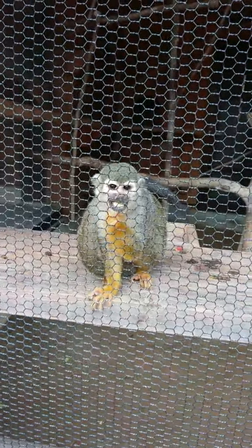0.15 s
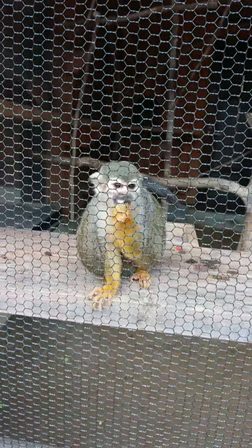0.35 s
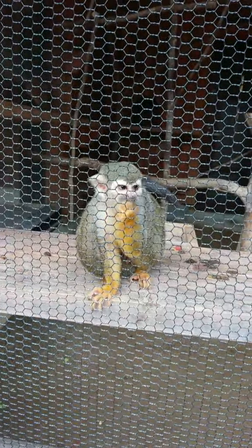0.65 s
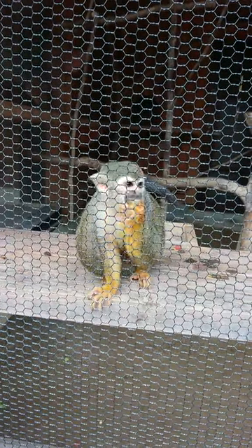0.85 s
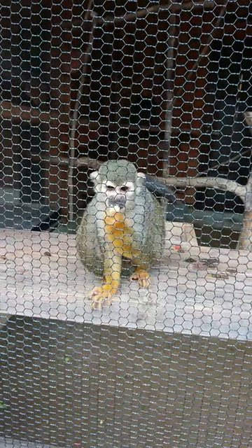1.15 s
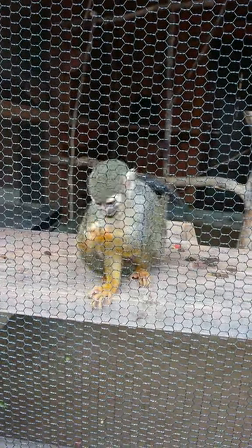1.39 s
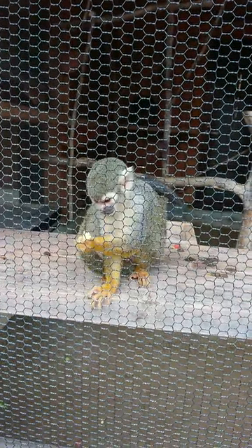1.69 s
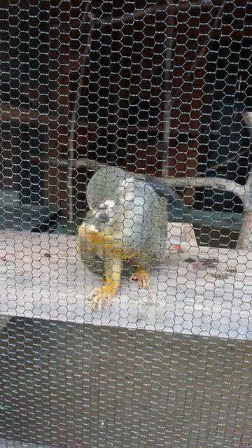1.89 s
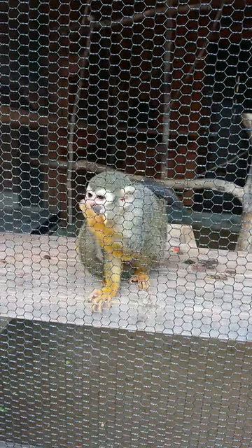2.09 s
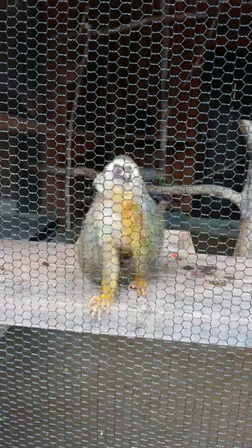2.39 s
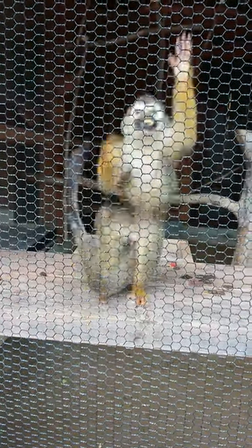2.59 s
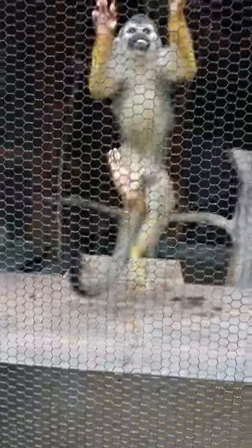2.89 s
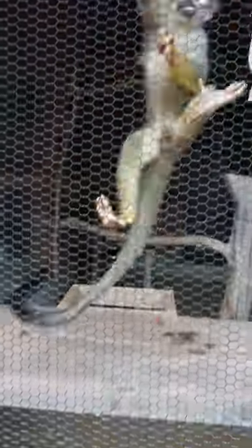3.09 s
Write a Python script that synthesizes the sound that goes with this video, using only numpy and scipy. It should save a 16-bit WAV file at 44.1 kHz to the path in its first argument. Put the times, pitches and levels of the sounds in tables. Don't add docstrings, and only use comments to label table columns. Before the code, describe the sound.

Small monkey peeps: a whistled call breaks upward at 0.2-0.4 s, then a faint chirp at 1.4 and a loud falling one at 1.5. Faint hoarse distant calls fall around 1.9-2.4. Very high chirps cluster at 2.6-2.8, and another breaking call comes at 2.9. Brief wall reverberation and faint insect hiss on the left; gusty rumble, scattered soft knocks and a grip rustle at 1.7-1.8 on the right.

```python
import sys
import numpy as np
from scipy import signal
from scipy.fft import rfft, irfft
from scipy.io import wavfile
from scipy.ndimage import uniform_filter1d

SR = 44100
rng = np.random.default_rng(int(sys.argv[2]) if len(sys.argv) > 2 else 0)


def wav_out(sig):
    wavfile.write(sys.argv[1], SR, np.round(np.clip(np.atleast_2d(sig).T, -1, 1) * 32767).astype(np.int16))


def amplitude_ratio(level_db):
    exponent = np.asarray(level_db, float) / 20
    return 10 ** exponent


N = 143325

# pitch_hz, density_db (per Hz)
OPEN_AIR = [(40, -78), (130, -79), (430, -89.5), (1700, -93), (3500, -100), (8600, -105), (9700, -122),
            (12500, -135)]
COVERED_AIR = [(200, -86.5), (430, -83.5), (860, -98), (1700, -107), (3500, -115), (4700, -120),
               (5400, -132), (9000, -140)]
# pitch_hz, density_db (per Hz)
HISS = [(4000, -137), (7000, -133), (10000, -123), (12600, -122), (13300, -136), (14300, -142),
        (15300, -132), (15800, -131)]
# pitch_hz, density_db (per Hz)
WIND = [(22, -85), (32, -87), (45, -59), (80, -56.5), (130, -71.5), (220, -81.5), (400, -116), (1500, -170)]
# start_s, level_db
GUSTS = [(0.0, -58), (0.04, -66.5), (0.27, -56.5), (0.4, -63), (0.46, -40.5), (0.5, -60), (0.97, -61.5),
         (0.99, -50.5), (1.25, -63), (1.31, -50), (1.37, -63), (1.67, -56), (1.72, -39), (1.88, -56),
         (2.94, -58.5), (3.09, -44), (3.13, -61), (3.25, -58.5)]
# pitch_hz, width_hz, level_db
INSECTS = [
    (5300, 1200, -65.5),
    (7680, 300, -77),
    (1605, 200, -75.5),
    (859, 170, -66.5),
]
# start_s, pitch_hz, level_db
BROKEN_CALLS = [
    [(.205, 6000, -49), (.209, 5530, -33.5), (.213, 5110, -29.5), (.222, 4992, -29.5), (.233, 4990, -36),
     (.236, 5200, -41)],
    [(.235, 5660, -44), (.245, 6060, -36), (.27, 6220, -33.5), (.285, 6280, -35), (.3, 6430, -41),
     (.345, 6565, -43), (.375, 6350, -41), (.388, 6270, -52), (.4, 6300, -58)],
    [(2.904, 5730, -44), (2.907, 5300, -44), (2.914, 5070, -35.5), (2.923, 5300, -39), (2.931, 5540, -31),
     (2.936, 6280, -38.5)],
    [(2.935, 6550, -49), (2.939, 7000, -29.5), (2.944, 7500, -37), (2.949, 7120, -41), (2.958, 6180, -45)],
]
# start_s, pitch_hz, level_db
CHIRPS = [
    [(1.378, 8570, -83), (1.388, 8340, -60), (1.393, 7770, -42), (1.397, 6860, -55)],
    [(1.46, 8040, -44), (1.465, 9200, -35.5), (1.471, 8060, -22.5), (1.476, 7540, -21.5),
     (1.478, 6940, -27.5), (1.484, 6360, -31.5), (1.487, 6590, -38), (1.495, 5970, -45.5)],
    [(2.605, 11300, -61), (2.608, 11670, -28.5), (2.616, 11760, -34.5), (2.624, 11650, -24),
     (2.631, 11000, -30.5), (2.637, 10600, -52), (2.642, 10400, -74)],
    [(2.671, 8450, -45), (2.674, 9250, -41.5), (2.681, 10300, -45.5), (2.69, 10900, -47),
     (2.697, 11300, -58), (2.706, 10900, -52)],
    [(2.747, 7500, -43), (2.753, 7490, -21), (2.757, 8270, -30), (2.763, 9400, -39), (2.769, 10250, -32.5),
     (2.776, 10740, -45), (2.783, 10100, -38), (2.79, 9600, -55)],
]
# second_partial_db, third_partial_db, trill_hz (depth)
VOICES = [(-24.5, -62, 31), (-19.5, -60, 74), (-7, -30, 10), (-15, -33, 14), (-50, -70, 10), (-37, -91, 49),
          (-60, -70, 10), (-60, -70, 10), (-42, -70, 10)]
# start_s, peak_db, pitch_hz, snap_db
KNOCKS = [(.241, -26, 103, 2.5), (.449, -27, 97, 5), (0.986, -29, 79, 7.5), (1.033, -24, 66, 1),
          (1.712, -18.5, 104, 1.5), (1.751, -22.5, 135, 4), (1.786, -25.5, 108, -3.5),
          (1.826, -32.5, 87, 10.5), (1.945, -28, 79, 8), (2.204, -27.5, 95, -2), (2.827, -31, 133, 1),
          (3.058, -22.5, 84.5, -2)]
# start_s, length_s, level_db, pitch_hz
SCUFFS = [
    (0.465, 0.016, -53.5, 4500),
    (0.67, 0.022, -98, 8500),
    (1.831, 0.01, -64, 6900),
    (2.072, 0.028, -53, 3600),
    (3.21, 0.014, -80, 6300),
]
# start_s, length_s, level_db, start_hz, end_hz
FAR_CALLS = [
    (1.893, .045, -52, 5400, 4050),
    (2.232, .015, -70, 4860, 4700),
    (2.37, 0.014, -54, 4100, 3800),
]

NEAR_DB, EDGE_S, PARTIAL_FOLLOWS = 5.5, 0.0011, 0.23
TRILL_RATE_HZ, TRILL_BEAT_DB = 91.95, 0.5
WOBBLE_HZ, SHIMMER_DB = 24.5, 1
ECHO_S, ECHO_DB = .0065, -14
WALLS_DB, WALLS_T60_S, WALLS_START_S = -13.5, 0.21, .004
FAR_DB, FAR_T60_S, FAR_CUT_HZ = -20, 0.52, 9300
KNOCK_DB, KNOCK_T60_S, KNOCK_LEAK_DB = 9.5, 0.057, -51.5
SNAP_DB, SNAP_HZ, SNAP_T60_S = -20, 338, 0.021
SCUFF_WIDTH = 1.71
RUSTLE_START_S, RUSTLE_END_S, RUSTLE_DB, RUSTLE_HZ = 1.72, 1.84, -40.5, 213
FAR_ROUGH_HZ = 353
DIP_HZ, DIP_WIDTH_HZ, DIP_SHARE = 13700, 2200, 0.89
COVERED_DB, COVERED_LEAD_S = -50, .001
LOW_CUT_HZ, TOP_CUT_HZ = 36.5, 16000


def in_time(rows):
    s, *columns = np.transpose(rows)
    return [np.interp(np.arange(N) / SR, s, column) for column in columns]


def drift(rate_hz):
    r = np.exp(-2 * np.pi * rate_hz / SR)
    slow = signal.lfilter([1], [1, -2 * r, r * r], rng.standard_normal(N + SR))[SR:]
    return slow / slow.std()


def band(x, low_hz, high_hz):
    sos = signal.butter(2, [low_hz, min(high_hz, .45 * SR)], "band", fs=SR, output="sos")
    return signal.sosfilt(sos, x)


def air(spectrum, patchy_db, rate_hz):
    hz, db = np.transpose(spectrum)
    f = np.fft.rfftfreq(N, 1 / SR) + 1
    density = amplitude_ratio(np.interp(np.log(f), np.log(hz), db)) * np.sqrt(SR / 2)
    shaped = rfft(rng.standard_normal(N)) * density
    shaped[f < 20] = 0
    place = 2 * np.log2(f / 20)
    out = np.zeros(N)
    for k in range(21):
        share = np.clip(1 - abs(place - k), 0, 1)
        out += irfft(shaped * share, N) * amplitude_ratio(patchy_db * drift(rate_hz))
    return out


def wind():
    gust_db, = in_time(GUSTS)
    swell = amplitude_ratio(0.6 * (gust_db - gust_db.mean()))
    return swell * air(WIND, patchy_db=4.0, rate_hz=9.8)


def insects():
    out = np.zeros(N)
    for hz, width_hz, db in INSECTS:
        chorus = band(rng.standard_normal(N), hz - width_hz / 2, hz + width_hz / 2)
        out += amplitude_ratio(db) * np.sqrt(SR / 2 / width_hz) * chorus
    return out


def peeps():
    t, out = np.arange(N) / SR, np.zeros(N)
    wobble, shimmer = drift(100), drift(120)
    trill = 2 * np.pi * TRILL_RATE_HZ * np.cumsum(1 + 0.123 * drift(16)) / SR
    for rows, (second_db, third_db, trill_hz) in zip(BROKEN_CALLS + CHIRPS, VOICES):
        hz, db = in_time(rows)
        hz = uniform_filter1d(hz, size=90) + trill_hz * np.sin(trill) + WOBBLE_HZ * wobble
        phase = 2 * np.pi * np.cumsum(hz) / SR
        gate = np.clip(np.minimum(t - rows[0][0], rows[-1][0] - t) / EDGE_S, 0, 1)
        effort = amplitude_ratio(PARTIAL_FOLLOWS * (db - db.max()))
        second = amplitude_ratio(second_db) * np.sin(2 * phase) * (hz < SR / 4.2)
        third = amplitude_ratio(third_db) * np.sin(3 * phase) * (hz < SR / 6.3)
        tone = np.sin(phase) + effort * (second + third)
        beat_db = TRILL_BEAT_DB * trill_hz / 100 * np.cos(trill)
        out += np.sqrt(2) * gate * amplitude_ratio(db + NEAR_DB + SHIMMER_DB * shimmer + beat_db) * tone
    return out


def walls(x):
    t = np.arange(SR) / SR

    def tail(db, t60_s):
        level = np.sqrt(2 * np.log(1000) / t60_s / SR)
        return amplitude_ratio(db - 60 * t / t60_s) * level * rng.standard_normal(SR)

    near = tail(WALLS_DB, WALLS_T60_S)
    far = tail(FAR_DB, FAR_T60_S)
    far = signal.sosfilt(signal.butter(2, FAR_CUT_HZ, fs=SR, output="sos"), far)
    return signal.fftconvolve(x, (near + far) * np.clip(t / WALLS_START_S, 0, 1))[:N]


def knocks():
    out, t = np.zeros(N + SR), np.arange(SR // 2) / SR
    for s, db, hz, snap_db in KNOCKS:
        body = amplitude_ratio(-60 * t / KNOCK_T60_S) * np.sin(2 * np.pi * hz * t) * (1 - np.exp(-t / 0.0051))
        snap = amplitude_ratio(SNAP_DB + snap_db - 60 * t / SNAP_T60_S) * np.sin(2 * np.pi * SNAP_HZ * t)
        snap *= 1 - np.exp(-t / 0.00027)
        start = int(s * SR)
        out[start:start + len(t)] += amplitude_ratio(db + KNOCK_DB) * (body + snap)
    return out[:N]


def scuffs():
    t, out = np.arange(N) / SR, np.zeros(N)
    for s, length_s, db, hz in SCUFFS:
        low_hz, high_hz = hz / SCUFF_WIDTH, hz * SCUFF_WIDTH
        hiss = band(band(rng.standard_normal(N), low_hz, high_hz), low_hz, high_hz)
        rise = np.clip((t - s) / 0.0034, 0, 1)
        out += amplitude_ratio(db) * 2 * hiss * rise * np.exp(-np.maximum(t - s, 0) / length_s)
    return out


def rustle():
    t = np.arange(N) / SR
    gate = np.clip(np.minimum(t - RUSTLE_START_S, RUSTLE_END_S - t) / .015, 0, 1)
    rumble = band(rng.standard_normal(N), RUSTLE_HZ / 1.6, RUSTLE_HZ * 1.63)
    rumble = band(rumble, RUSTLE_HZ / 2.2, RUSTLE_HZ * 1.64)
    return gate * amplitude_ratio(RUSTLE_DB + 17.5 + 5.2 * drift(27)) * rumble


def far_calls():
    t, out = np.arange(N) / SR, np.zeros(N)
    hoarse = FAR_ROUGH_HZ * drift(400)
    for s, length_s, db, start_hz, end_hz in FAR_CALLS:
        u = np.clip((t - s) / length_s, 0, 1)
        hz = hoarse + start_hz + (end_hz - start_hz) * u
        out += amplitude_ratio(db) * np.sin(np.pi * u) * np.sin(2 * np.pi * np.cumsum(hz) / SR)
    return .3 * out + 5 * walls(out)


def scene():
    calls, case = peeps(), knocks()
    echo = amplitude_ratio(ECHO_DB) * np.roll(calls, int(ECHO_S * SR))
    heard = calls + echo + walls(calls)
    heard = heard - DIP_SHARE * signal.lfilter(*signal.iirpeak(DIP_HZ, DIP_HZ / DIP_WIDTH_HZ, fs=SR), heard)
    open_air = air(OPEN_AIR, patchy_db=.4, rate_hz=10)
    left = heard + far_calls() + insects() + scuffs() + open_air - amplitude_ratio(KNOCK_LEAK_DB) * case
    leak = amplitude_ratio(COVERED_DB) * np.diff(np.roll(calls, -int(COVERED_LEAD_S * SR)), prepend=0)
    covered_air = air(COVERED_AIR, patchy_db=.6, rate_hz=10)
    right = leak + case + wind() + covered_air + rustle()
    hiss = [air(HISS, patchy_db=-2.5, rate_hz=6) for side in "LR"]
    return np.array([left, right]) + hiss


def low_pass(x):
    return signal.sosfilt(signal.butter(12, 16000, fs=SR, output="sos"), x)


def record(dry):
    x = signal.sosfilt(signal.butter(4, LOW_CUT_HZ, "high", fs=SR, output="sos"), dry)
    mix = signal.sosfilt(signal.ellip(10, .5, 60, TOP_CUT_HZ, fs=SR, output="sos"), x)
    return low_pass(mix)


dry = scene()
out = record(dry)
wav_out(out)
```